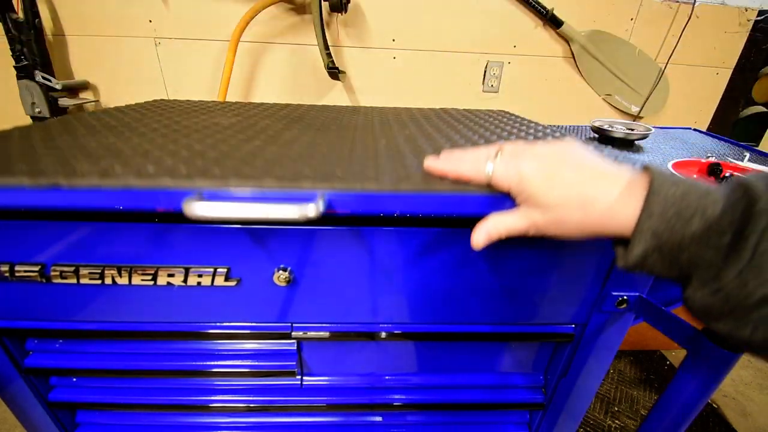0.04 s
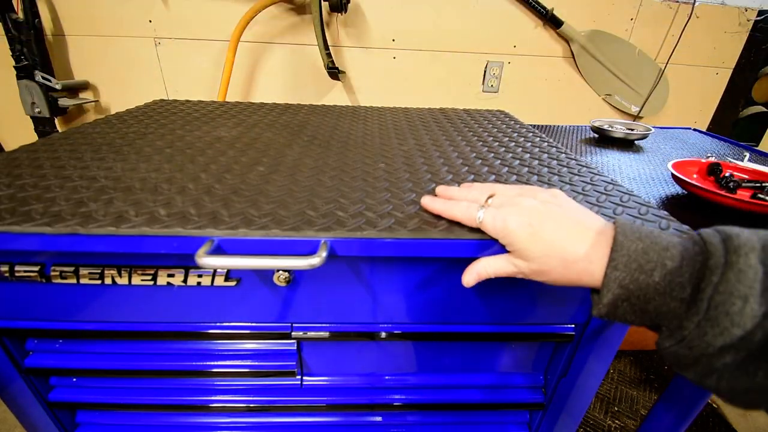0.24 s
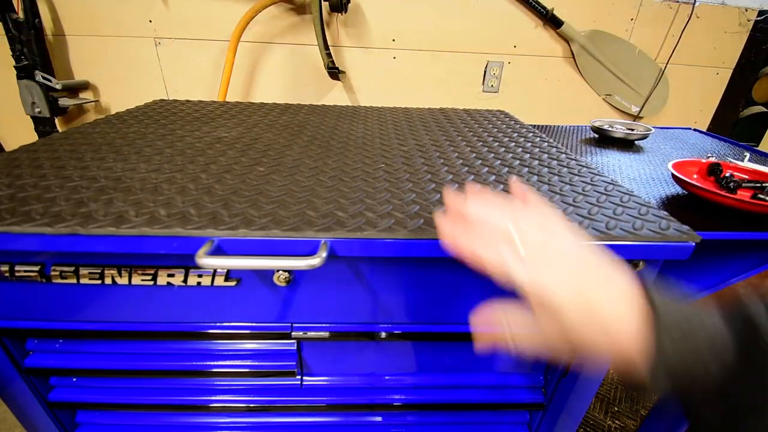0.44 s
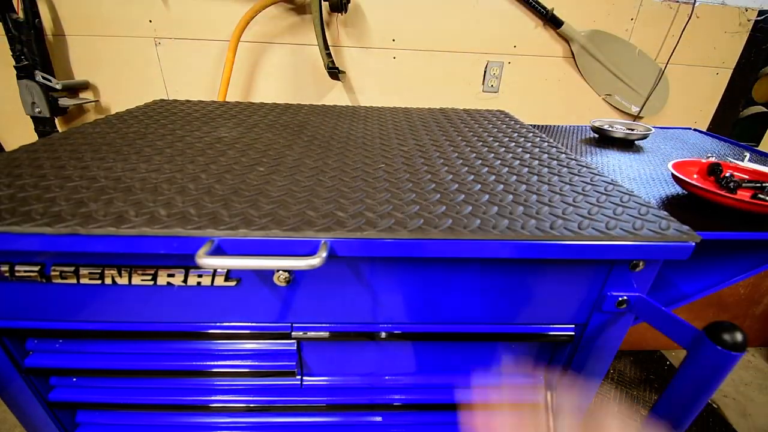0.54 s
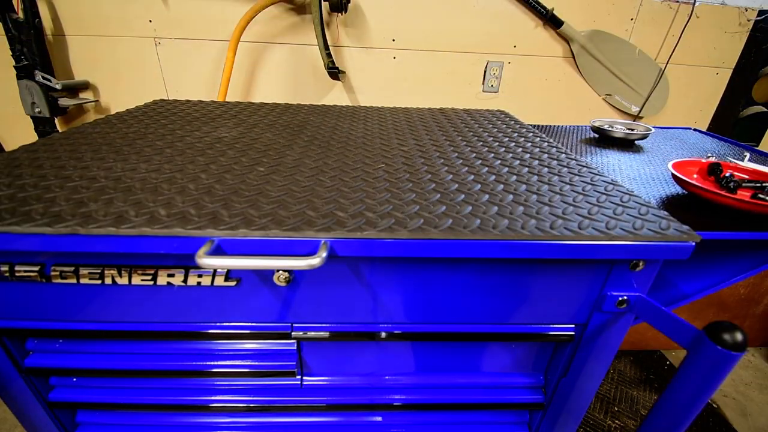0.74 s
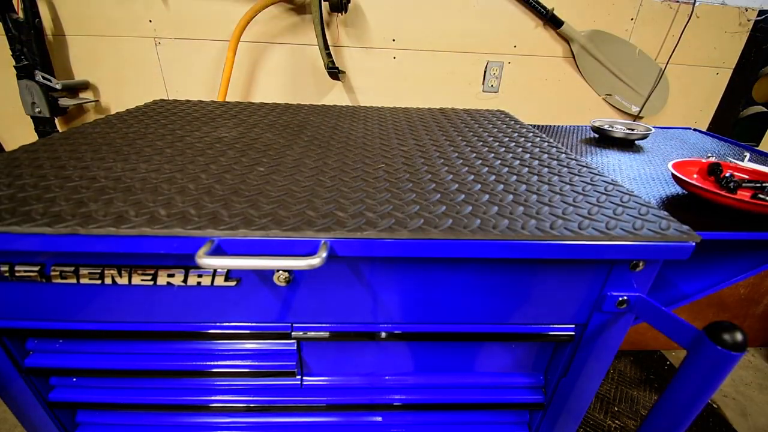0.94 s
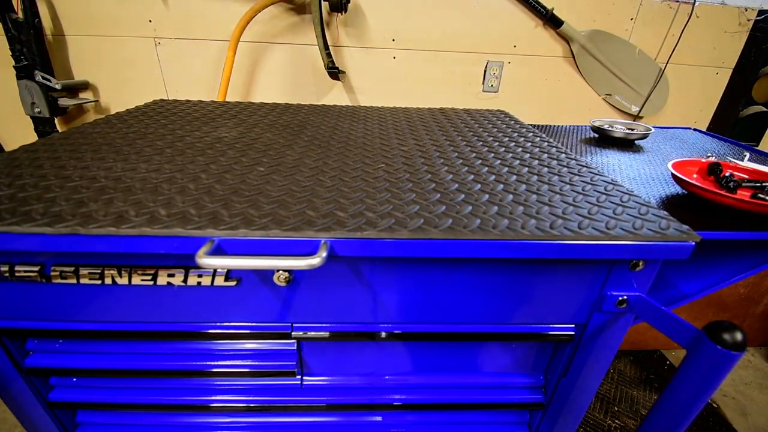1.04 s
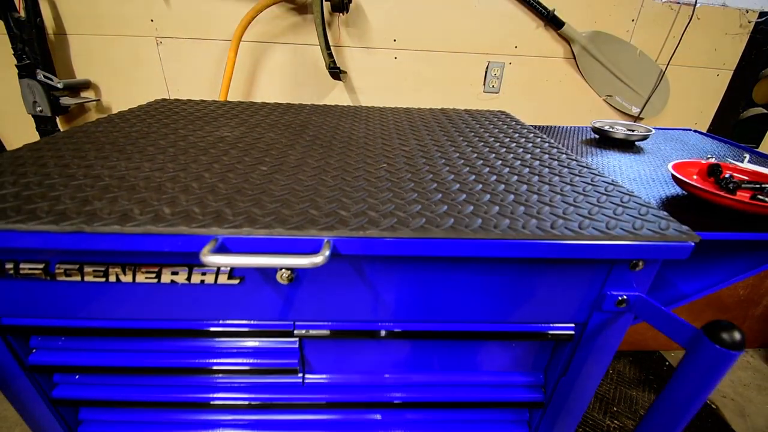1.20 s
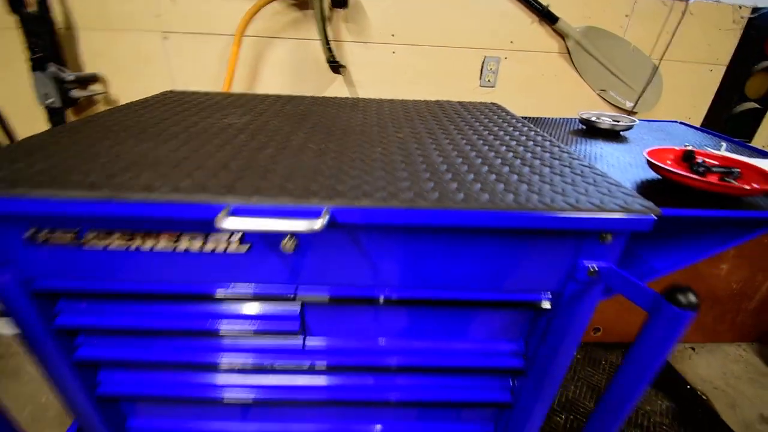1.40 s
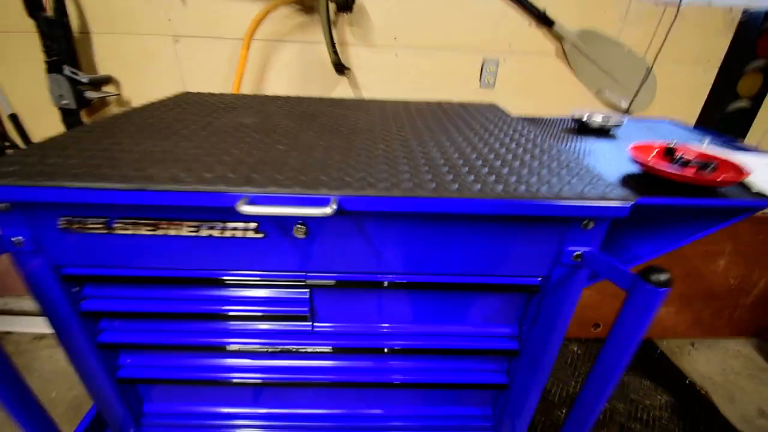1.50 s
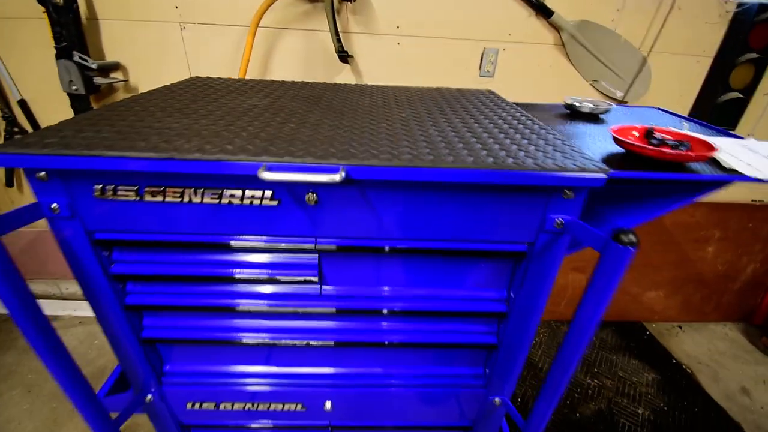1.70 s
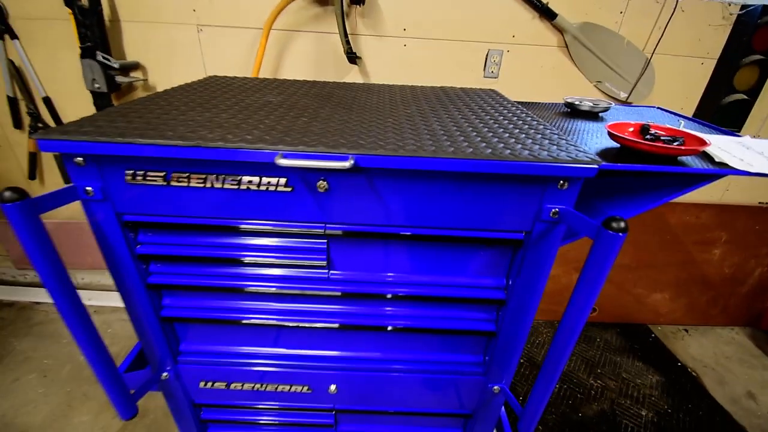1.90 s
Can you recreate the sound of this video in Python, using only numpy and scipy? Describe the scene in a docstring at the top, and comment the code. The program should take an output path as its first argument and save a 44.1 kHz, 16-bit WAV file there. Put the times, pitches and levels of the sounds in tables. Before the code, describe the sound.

A heavy steel tool chest lid drops shut with a loud, bouncing clang and hollow boom, then loose metal rattles, the lock clicks sharply, and fingers rub and knock the camera; close stereo camera microphone in a garage.

```python
"""Soft taps on a steel tool chest in a garage; then its heavy lid drops shut and bounces: noise bands clang
as sheet metal, sine modes boom as the box. Loose steel rattles in flurries of noise ticks, and the lock clicks
in short noise bands. Then the camera is moved: fingers rub and knock on its case, as coloured noise and a low
note. Room tone lies under it all; the camera's limiter flattens the slam."""
import sys
import numpy as np
from scipy import signal
from scipy.fft import rfft, irfft, next_fast_len
from scipy.io import wavfile
from scipy.ndimage import uniform_filter1d

SR = 44100
rng = np.random.default_rng(int(sys.argv[2]) if len(sys.argv) > 2 else 0)


def int16_out(signal):
    """Quantize to a 16-bit WAV file."""
    q = np.round(np.clip(np.atleast_2d(signal).T, -1, 1) * 32767)
    wavfile.write(sys.argv[1], SR, q.astype(np.int16))


N = 85995

# left-right likeness of airborne sound: (frequency [Hz], correlation [0-1])
AIR_LIKENESS = [(30, 1), (200, 0.99), (500, 0.9), (1200, 0.62), (2200, 0.13), (9000, 0.08)]
# left-right likeness of sound through the camera case: (frequency [Hz], correlation [0-1])
CASE_LIKENESS = [(60, 0.72), (300, 0.61), (2000, 0)]


def amp(db):
    """Decibels to gain."""
    return 10 ** (np.asarray(db) / 20)


def unit(x):
    """Scale to rms 1."""
    return x / np.sqrt(np.mean(x ** 2) + 1e-20)


def along(points, hz):
    """Read (Hz, value) points on a log frequency axis."""
    point_hz, values = np.transpose(points)
    return np.interp(np.log(hz + 1), np.log(point_hz + 1), values)


def filtered(x, response):
    """Apply a response of frequency to x."""
    size = next_fast_len(N + 2048, True)
    spectrum = rfft(x, size) * response(np.fft.rfftfreq(size, 1 / SR))
    return irfft(spectrum, size)[..., :N]


def half_angle(likeness, hz):
    """Half the angle whose cosine is the left-right correlation."""
    return np.arccos(np.clip(along(likeness, hz), -1, 1)) / 2


def noise(colour, likeness, tilt=0, density=1):
    """Coloured stereo noise of rms 1; at a density under 1 it breaks into ticks."""
    grains = rng.standard_normal((2, N)) * (rng.random(N) < density)

    def mid_side_gain(hz):
        gain = amp(along(colour, hz) + tilt * np.log2(1 + hz / 1000))
        angle = half_angle(likeness, hz)
        return gain * [np.cos(angle), np.sin(angle)]

    mid, side = filtered(grains, mid_side_gain)
    return unit(np.array([mid + side, mid - side]))


def since(start_s):
    """Seconds since start_s, zero before it."""
    return np.maximum(np.arange(N) / SR - start_s, 0)


def strike(start_s, t60_s, rise_s=.0001):
    """Envelope with an exponential rise at start_s and an exponential decay."""
    t = since(start_s)
    return -np.expm1(-t / rise_s) * amp(-60 * t / t60_s)


def fading(x, t60_points, start_s=0):
    """From start_s on, each frequency of x decays at its own rate."""
    hz, t, z = signal.stft(x, SR, nperseg=256)
    t60_s = along(t60_points, hz)[:, None]
    decay = amp(-60 * np.maximum(t - start_s, 0) / t60_s)
    return signal.istft(z * decay, SR, nperseg=256)[1][:, :N]


def wobble():
    """Random curve: straight lines between normal draws."""
    draws_per_s = 24
    return np.interp(since(0) * draws_per_s, np.arange(256), rng.standard_normal(256))


def in_garage(x, wet_db):
    """Add the garage's diffuse echo: x convolved with decaying noise."""
    # reverberation: (frequency [Hz], t60 [s])
    garage_t60 = [(100, 0.71), (1000, 0.47), (4000, 0.52), (9000, 0.37), (15000, 0.37)]
    delay_s, rise_s = 0.0023, 0.0013
    tail = fading(noise([(30, 0), (16000, 0)], AIR_LIKENESS), garage_t60)
    tail = tail * -np.expm1(-since(delay_s) / rise_s)
    echo = signal.fftconvolve(x, tail / np.linalg.norm(tail[0]), axes=1)[:, :N]
    return x + amp(wet_db) * echo


def room_tone():
    """Steady broadband noise of the room."""
    # spectrum: (frequency [Hz], relative density [dB])
    tone_colour = [(20, -23), (60, -15.5), (110, -5), (200, -12), (500, -21), (1200, -23.5), (4000, -23.5),
                   (9000, -23), (11000, -28.5), (15500, -35)]
    level_db = -53
    return amp(level_db) * noise(tone_colour, AIR_LIKENESS)


def rubbing():
    """Fingers rub the camera case: grainy noise under a moving level."""
    # level curve: (time [s], level [dB])
    rub_levels = [(1.17, -53.5), (1.21, -46), (1.255, -52), (1.291, -25.5), (1.38, -34.5), (1.475, -31.5),
                  (1.53, -46), (1.61, -57), (1.702, -31), (1.779, -42), (1.869, -46.5), (1.95, -38)]
    # spectrum: (frequency [Hz], relative level [dB])
    rub_colour = [(20, -32), (75, 6), (180, 0), (235, 5), (265, 7), (310, -18), (430, 3), (700, 3),
                  (1100, -7.5), (2500, -12), (4500, -13.5), (8000, -15.5), (16000, -47)]
    level_db = np.interp(since(0), *np.transpose(rub_levels))
    return amp(level_db) * noise(rub_colour, CASE_LIKENESS, density=0.22)


def knocks():
    """Each knock on the case: thump, hollow clack, gritty scrape and a low note that lingers faintly."""
    # (time [s], thump [dB], clack [dB], low note [dB], scrape [dB], scrape tilt [dB/octave of 1 + f/1 kHz],
    #  t60 of thump, clack and scrape [s])
    knock_list = [(1.205, -40.5, -42, -33, -52, -9, 0.21), (1.265, -31, -27.5, -31, -52, -2, .12),
                  (1.31, -47, -22.5, -52, -54.5, -2, 0.12), (1.4837, -38, -18.5, -48, -15, -5.5, 0.053),
                  (1.501, -21, -26, -10.5, -22, 2.5, 0.089), (1.563, -29, -25, -19, -34.5, -1, 0.065),
                  (1.638, -17, -26, -32, -28.5, -7.5, 0.13), (1.6485, -15.5, -22, -23, -17, 2, 0.054),
                  (1.672, -18, -33.5, -27, -28.5, 5, 0.089), (1.703, -32, -25.5, -28, -19.5, 2.5, 0.083),
                  (1.716, -24.5, -21, -26, -26.5, -1.5, 0.12), (1.735, -44, -40, -37, -26.5, 3, 0.083),
                  (1.809, -41, -37.5, -37, -36.5, -3, 0.14)]
    # spectra: (frequency [Hz], relative level [dB])
    thump_colour = [(15, -43), (35, -10), (70, -31), (130, 2.5), (250, -8), (600, -13), (3000, -72)]
    clack_colour = [(30, -20), (150, -12.5), (255, -4.5), (340, -20.5), (480, -15.5), (720, -5),
                    (1000, -29), (2000, -26), (6000, -42)]
    scrape_colour = [(100, -6.5), (700, -10.5), (1500, -1.5), (3000, -4), (3800, -3.5), (4700, -1),
                     (5600, -6.5), (6500, -6), (10000, -17), (16000, -56)]
    rise_s, scrape_room_db = .0015, -8.5
    note_hz, note_t60_s = 274.6, 0.035
    linger_db, linger_t60_s = -13.5, 0.59  # level relative to the clack
    out, scrapes = np.zeros((2, N)), np.zeros((2, N))
    for s, thump_db, clack_db, note_db, scrape_db, tilt, t60_s in knock_list:
        envelope = strike(s, t60_s, rise_s)
        thump = amp(thump_db) * noise(thump_colour, CASE_LIKENESS)
        clack = amp(clack_db) * noise(clack_colour, CASE_LIKENESS)
        out += (thump + clack) * envelope
        note = amp(note_db) * strike(s, note_t60_s, rise_s)
        note = note + amp(clack_db + linger_db) * strike(s, linger_t60_s, rise_s)
        phase = 2 * np.pi * note_hz * since(s) + rng.normal(0, 0.41, (2, 1))
        out += note * np.sin(phase)
        scrape = noise(scrape_colour, CASE_LIKENESS, tilt, density=0.18)
        scrapes += amp(scrape_db) * scrape * envelope
    return out + in_garage(scrapes, scrape_room_db)


def taps():
    """Light contacts sound the hollow midrange of the chest's panels as noise bursts."""
    # (time [s], level [dB], t60 [s])
    tap_list = [(0.1534, -36.5, 0.089), (.184, -51, 0.072), (0.809, -32.5, 0.2), (1.125, -46.5, .2)]
    # spectrum: (frequency [Hz], relative level [dB])
    tap_colour = [(60, -19), (230, -1.5), (350, -10.5), (620, 4), (820, -4), (1100, -14), (4000, -23),
                  (12000, -39)]
    rise_s, room_db = 0.0017, -4
    out = np.zeros((2, N))
    for s, db, t60_s in tap_list:
        out += amp(db) * noise(tap_colour, AIR_LIKENESS) * strike(s, t60_s, rise_s)
    return in_garage(out, room_db)


def rattles():
    """Loose steel rattles in short flurries of ticks."""
    # (time [s], level [dB], rise time constant [s], t60 [s], tilt [dB/octave of 1 + f/1 kHz])
    rattle_list = [(0.181, -38.5, 0.0018, 0.11, -20.5), (.53, -31.5, 0.017, 0.18, 6.5),
                   (0.599, -30, 0.0012, 0.17, 0.5), (0.734, -42.5, 0.0028, 0.12, 3),
                   (0.801, -26.5, 0.013, 0.28, 0.5), (1.087, -31, 0.009, 0.15, 1.5),
                   (1.104, -23.5, 0.0026, 0.094, 2.5), (1.274, -26.5, .001, 0.23, 8),
                   (1.322, -19, 0.012, 0.17, 5)]
    # spectrum: (frequency [Hz], relative level [dB])
    rattle_colour = [(60, -27), (250, 2), (700, -1.5), (1800, 5.5), (4500, 4), (9000, 0), (11000, -12),
                     (16000, -26)]
    ticks_per_s, room_db = 2800, 1.5
    out = np.zeros((2, N))
    for s, db, rise_s, t60_s, tilt in rattle_list:
        ticks = noise(rattle_colour, AIR_LIKENESS, tilt, ticks_per_s / SR)
        out += amp(db) * ticks * strike(s, t60_s, rise_s)
    return in_garage(out, room_db)


def lock():
    """The lock and other small hard parts snap with almost no ring, each above its own band edge."""
    # (time [s], level [dB], lower band edge [Hz])
    click_list = [(0.8062, -16.5, 6250), (0.8103, -13, 8640), (0.813, -12.5, 8550), (0.8193, -12, 6840),
                  (1.0425, -8.5, 3900), (1.529, -26, 4950), (1.715, -20.5, 10500)]
    # spectrum: (frequency [Hz], relative level [dB])
    click_colour = [(100, -33), (2500, 9), (4300, 6), (6000, 8), (9000, 4.5), (11500, -4.5), (16000, -15)]
    t60_s, room_db = 0.0064, -1
    edge_ratio, below_edge_db = .8, -17
    out = np.zeros((2, N))
    for s, db, edge_hz in click_list:
        edge = [(edge_ratio * edge_hz, below_edge_db), (edge_hz, 0)]
        snap = filtered(noise(click_colour, AIR_LIKENESS), lambda hz: amp(along(edge, hz)))
        out += amp(db) * unit(snap) * strike(s, t60_s)
    return in_garage(out, room_db)


def lid_clang(blows):
    """Each blow cracks and sets off a crowd of high sheet modes, as noise fading by frequency."""
    # spectrum: (frequency [Hz], relative level [dB])
    sheet_colour = [(30, -31), (70, -6), (130, -1), (300, 0.5), (800, 1.5), (2000, 1.5), (4000, 3),
                    (8500, -4), (11000, -19), (16000, -35)]
    # decay: (frequency [Hz], t60 [s])
    sheet_t60 = [(60, 0.6), (300, 0.51), (2000, 0.31), (5000, 0.14), (12000, 0.18)]
    crack_db, crack_t60_s, room_db = -15, 0.12, -13.5
    clang = np.zeros((2, N))
    for s, clang_db, _, _ in blows:
        sheet = fading(noise(sheet_colour, AIR_LIKENESS), sheet_t60, s) * (since(s) > 0)
        crack = noise(sheet_colour, AIR_LIKENESS, tilt=7.9, density=0.15) * strike(s, crack_t60_s)
        clang += amp(clang_db) * (sheet + amp(crack_db) * crack)
    return in_garage(clang, room_db)


def lid_boom(blows):
    """Blows add energy to the box's sine modes, whose pitch and level waver at random."""
    # (frequency [Hz], mean level [dB], t60 [s])
    modes = [(168, -4, 0.54), (201.5, -4, 0.52), (307.8, -11, 0.57), (361.6, 1.5, 0.28), (484, -10, 0.28),
             (547, -4.5, 0.23), (629, -7.5, 0.3), (729, -12.5, 0.33), (799, -11.5, 0.34),
             (895, -12.5, 0.37), (1201, -15, 0.33), (1646, -13.5, 0.33), (1897, -25.5, 0.51)]
    swell_s, wander_rad, flutter_db = .03, .6, 2.2
    boom = np.zeros((2, N))
    for hz, db, t60_s in modes:
        octaves = np.log2(hz / modes[0][0])
        energy = np.zeros(N)
        for s, _, boom_db, tilt in blows:
            energy += (amp(boom_db + tilt * octaves) * strike(s, t60_s, swell_s)) ** 2
        # opposite phase shifts left and right
        spread = half_angle(AIR_LIKENESS, hz) * rng.choice([-1, 1]) * np.array([[1], [-1]])
        phase = 2 * np.pi * (hz * since(0) + rng.random()) + wander_rad * wobble()
        level = amp(db + flutter_db * wobble()) * np.sqrt(energy)
        boom += level * np.sin(phase + spread)
    return boom


def lid():
    """The falling lid's blows excite both sheet clang and box boom."""
    # (time [s], clang [dB], boom [dB], boom tilt [dB/octave above the lowest mode])
    blows = [(0.2143, 1.5, -0.5, -6), (0.2252, -0.5, -3, -3), (0.249, 1, 0.5, -2.5),
             (0.2989, -2.5, -19.5, 6.5), (0.31, -1.5, -3.5, 4.5), (0.325, -3, -4, -6), (0.359, -9, -10, 3),
             (0.3857, -6.5, -39, -16), (0.434, -34, -38, -5)]
    return lid_clang(blows) + lid_boom(blows)


def scene():
    """Room tone, the hand on the camera and the chest."""
    return room_tone() + rubbing() + knocks() + taps() + rattles() + lock() + lid()


def record(dry):
    """A limiter ducks on short-term power and recovers slowly; remaining peaks clip; then the band limit."""
    window_s, limit_rms, release_db_per_s = 0.017, .42, 43
    top_hz = 15700
    power = uniform_filter1d(np.mean(dry ** 2, 0), max(int(window_s * SR), 2))  # centred window
    over_db = 10 * np.log10(np.maximum(power / limit_rms ** 2, 1))
    recovery_db = release_db_per_s * since(0)
    duck_db = np.maximum.accumulate(over_db + recovery_db) - recovery_db
    clipped = np.clip(dry * amp(-duck_db), -1, 1)
    return filtered(clipped, lambda hz: hz < top_hz)


dry = scene()
out = record(dry)
int16_out(out)
```